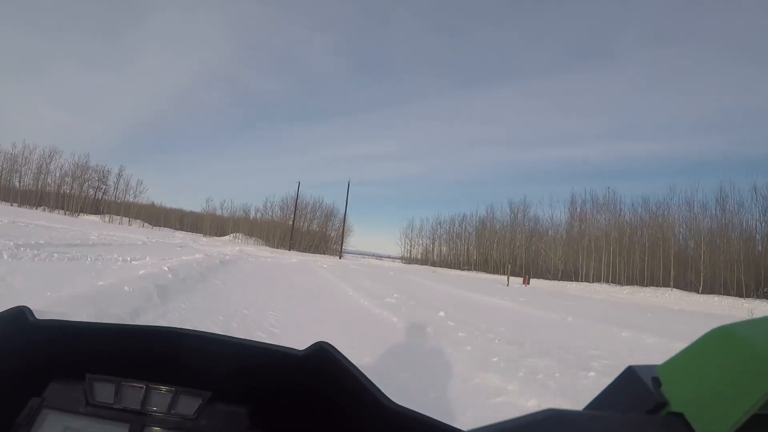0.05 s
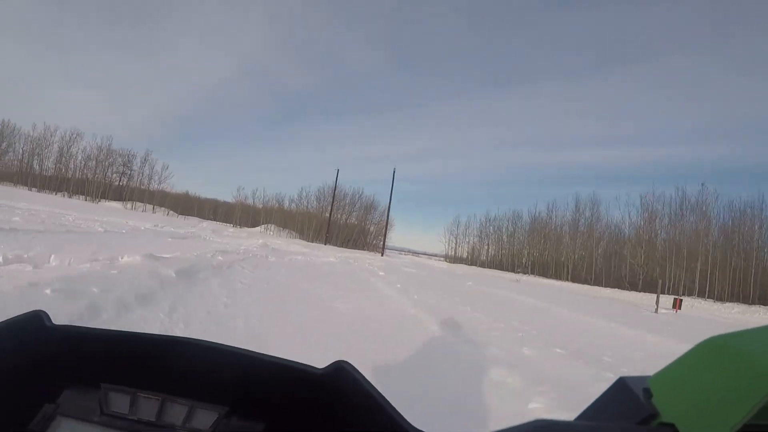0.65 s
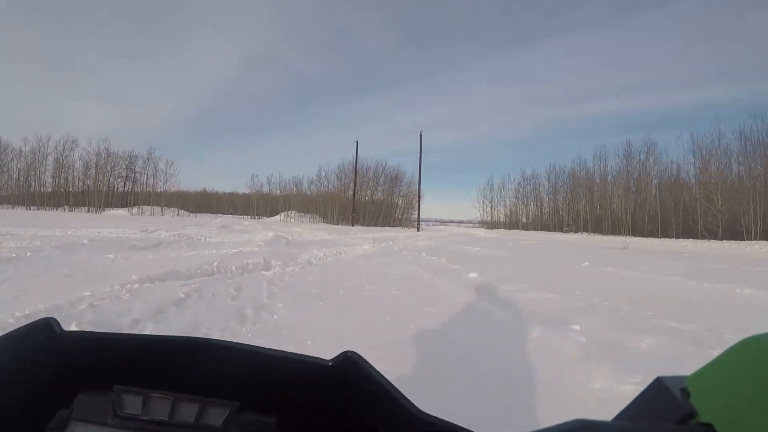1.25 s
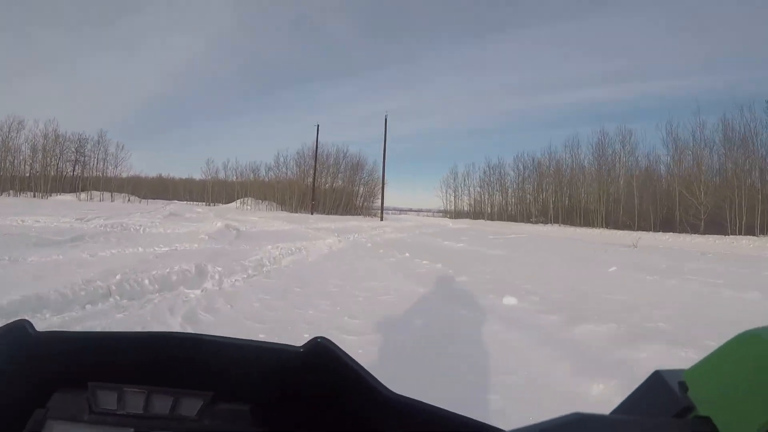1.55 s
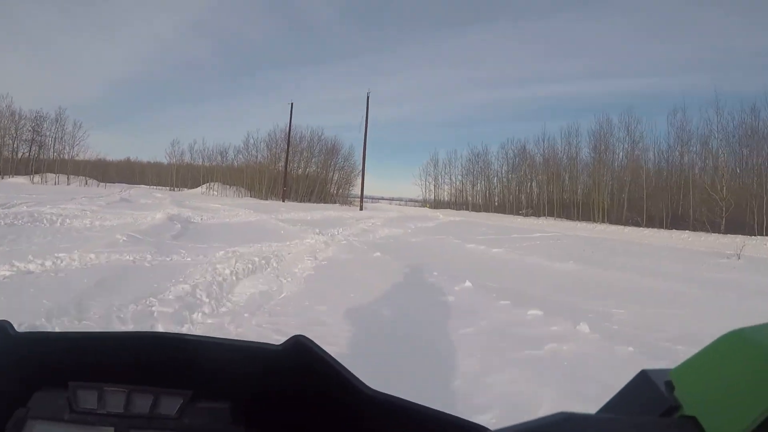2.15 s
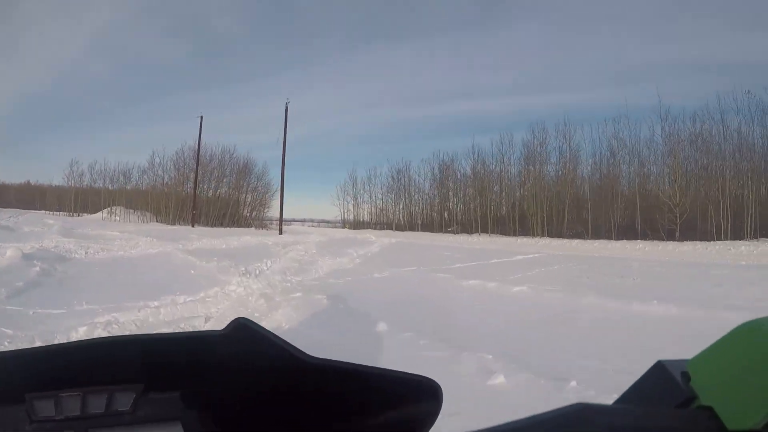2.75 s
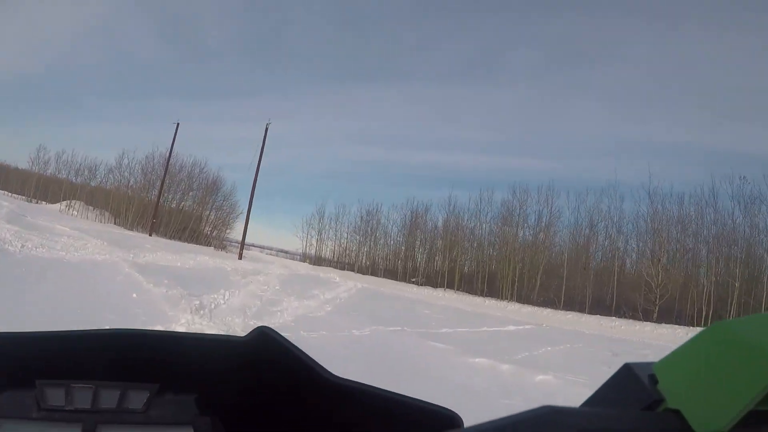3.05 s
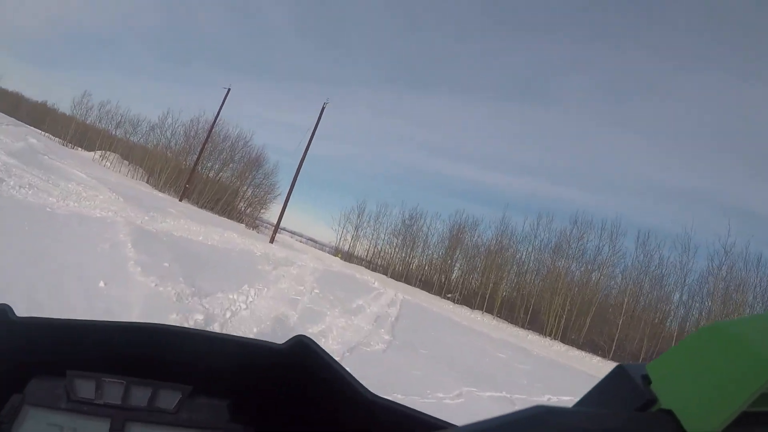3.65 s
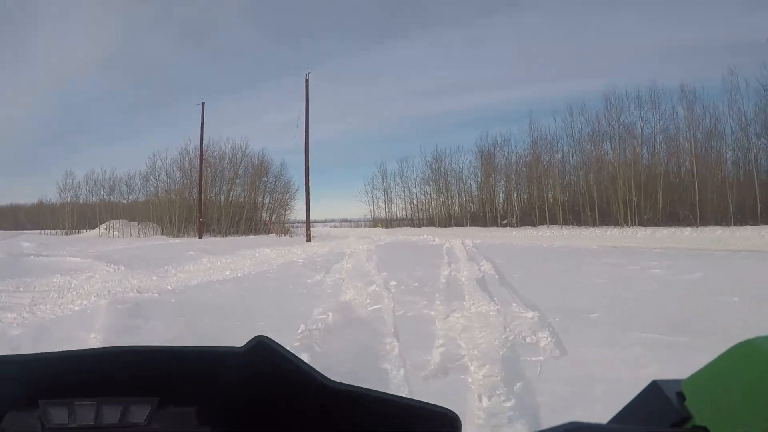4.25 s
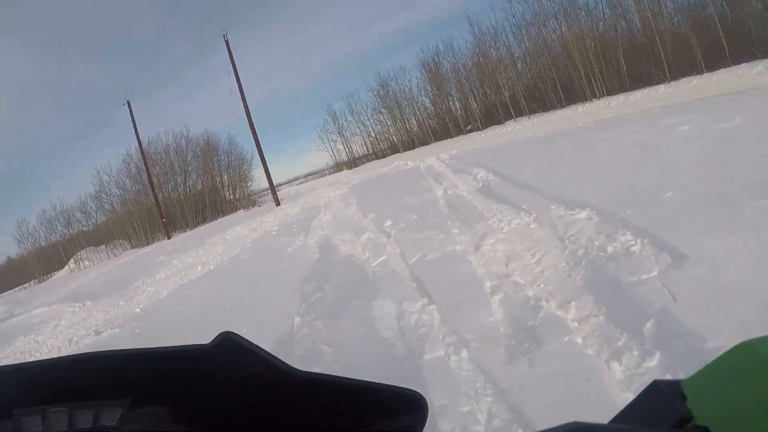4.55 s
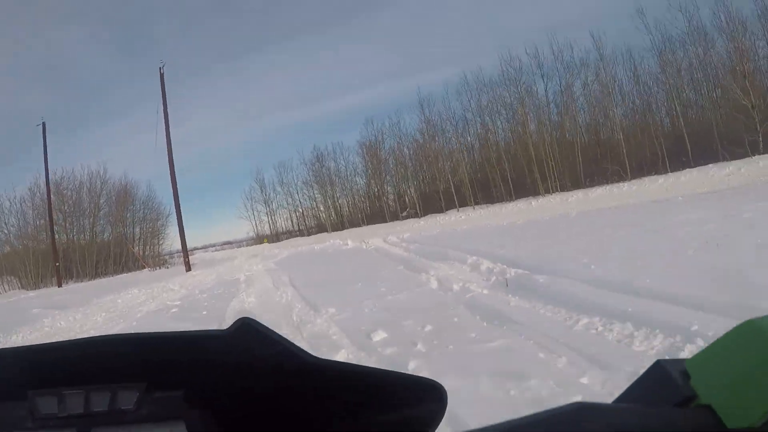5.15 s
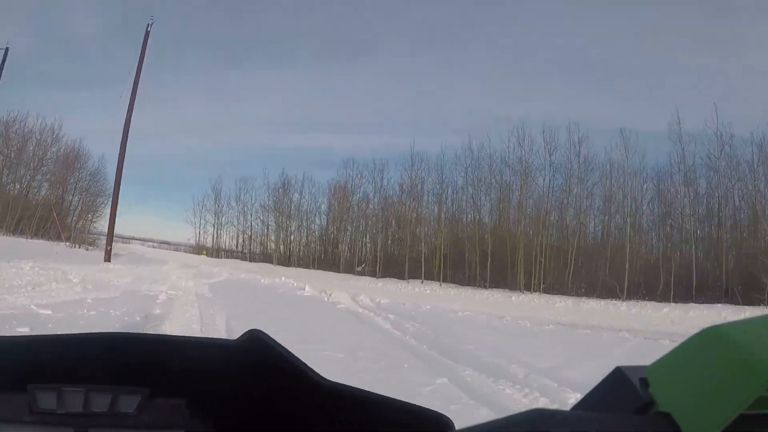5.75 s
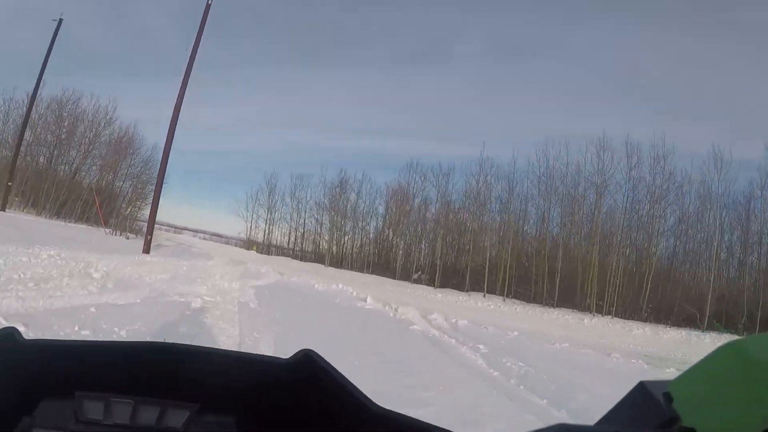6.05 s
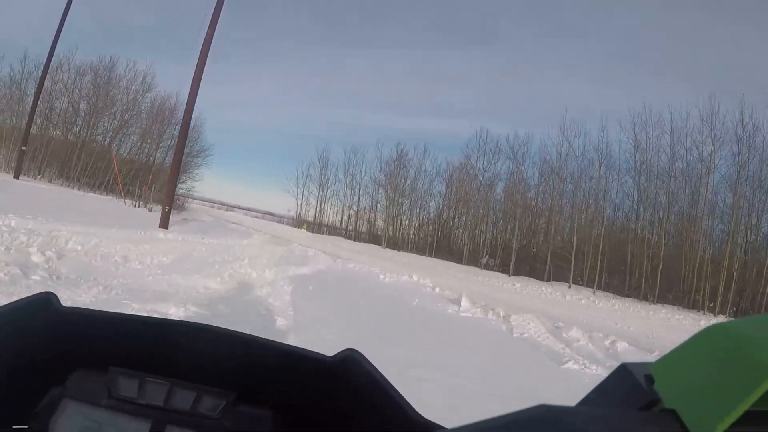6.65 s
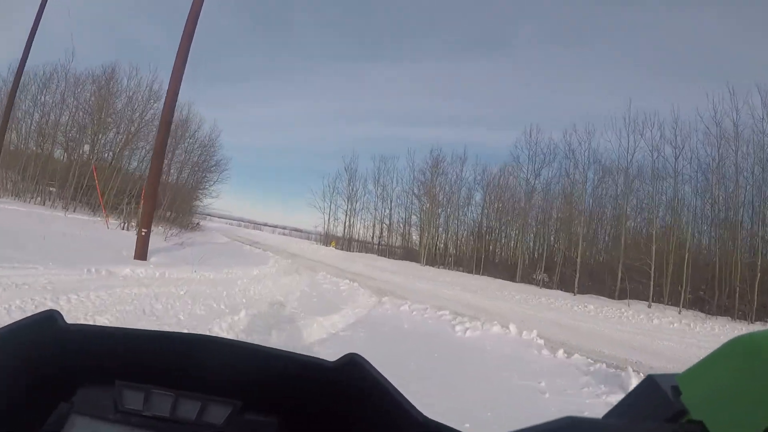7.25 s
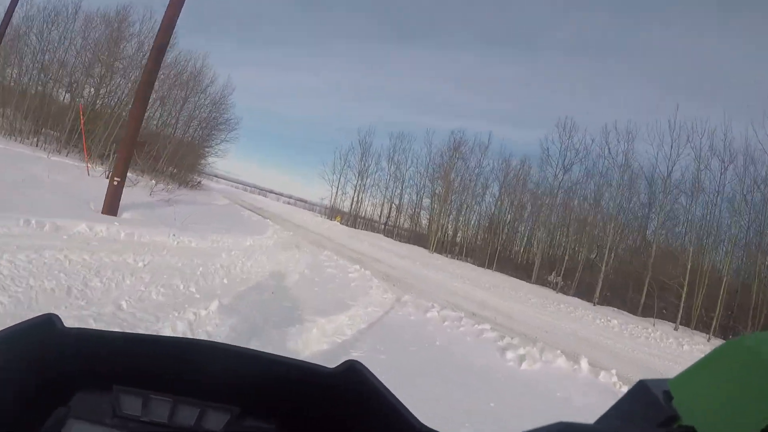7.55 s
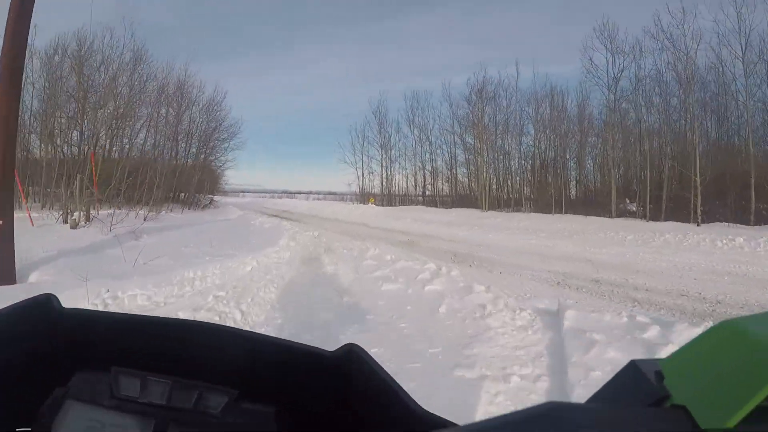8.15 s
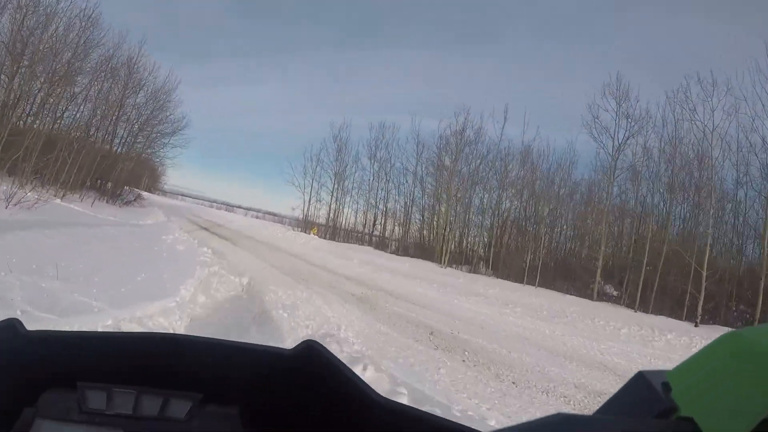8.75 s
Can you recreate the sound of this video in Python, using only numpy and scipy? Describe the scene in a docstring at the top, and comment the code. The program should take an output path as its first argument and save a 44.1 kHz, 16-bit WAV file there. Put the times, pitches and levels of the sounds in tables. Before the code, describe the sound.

A snowmobile's exhaust drones throughout, swelling and fading with the throttle as its pitch dips, briefly climbs past the middle and settles again. The track hums and rattles the panels over a low rumble and faint snow hiss. Bumps bring clusters of chassis knocks and sharp plastic clacks about a third of the way in and near the end. The microphone rides outdoors in a case on the rider.

```python
"""A snowmobile's twin-cylinder exhaust drones and fades with the throttle, heard from a camera in a
case on the rider. Track lugs hum and shake the chassis and panels; firings and slaps ring the case.
Bumps in the trail swell a rumble and jolt the chassis, packed snow hisses and ticks, and the loose
camera mount clacks and buzzes. Early on, a low hum sags in pitch."""
import sys
import numpy as np
from scipy import signal
from scipy.fft import rfft, irfft
from scipy.io import wavfile
from scipy.ndimage import uniform_filter1d, minimum_filter1d

SR = 44100
rng = np.random.default_rng(int(sys.argv[2]) if len(sys.argv) > 2 else 0)


def wrap_up_sound(samples):
    """Save the sound to the file named by the first command line argument, as 16-bit audio."""
    columns = np.atleast_2d(samples).T
    # keep every value between -1 and 1, then stretch to whole-number steps
    tamed = np.clip(columns, -1, 1)
    steps = np.round(tamed * 32767).astype(np.int16)
    wavfile.write(sys.argv[1], SR, steps)


N = 396900
T = np.arange(N) / SR
BOOM_DB = -19.5  # steady chassis boom under full power


def undb(db):
    """Decibels to gain."""
    return 10 ** (np.asarray(db) / 20)


def unit(x):
    """Scale to rms 1."""
    return x / np.sqrt(np.mean(x ** 2))


def even(x, seconds):
    """Hold the level steady over spans longer than this."""
    return x / np.sqrt(uniform_filter1d(x ** 2, int(seconds * SR)) + 1e-9)


def curves(table):
    """One automation curve for each value column of a timed table."""
    times, *columns = np.transpose(table)
    return [np.interp(T, times, column) for column in columns]


def gate(start, stop, attack_s, release_s):
    """1 from start to stop, with a ramp from 0 before and back to 0 after."""
    return np.clip(1 + np.minimum((T - start) / attack_s, (stop - T) / release_s), 0, 1)


def swells(rows, bed_db):
    """Level in dB of a bed plus a rounded swell for each row (middle/s, length/s, level/dB)."""
    power = sum((undb(db) * np.cos(np.pi * np.clip((T - middle) / length, -.5, .5))) ** 2
                for middle, length, db in rows)
    return 10 * np.log10(undb(bed_db) ** 2 + power)


def drift(rate_hz):
    """Smooth random modulation of rms 1, rolled off above this rate."""
    hz = np.arange(N // 2 + 1) * SR / N
    return unit(irfft(rfft(rng.standard_normal(N)) / (1 + (hz / rate_hz) ** 4), N))


def tone(turns, db, wobble_rad, flutter_db):
    """A sine around rms level db that wavers in phase and level."""
    gain = np.sqrt(2) * undb(db + flutter_db * drift(19))
    return gain * np.sin(2 * np.pi * turns + wobble_rad * drift(13))


def bursts(turns, decay_turns, scatter_db):
    """A puff of noise at the start of every cycle, each of its own strength."""
    noise = rng.standard_normal(N)
    strength = undb(scatter_db * rng.standard_normal(4096))
    return unit(noise * strength[turns.astype(int) % len(strength)] * np.exp(-(turns % 1) / decay_turns))


def knocks(turns, scatter_db):
    """One sharp push every cycle, each of its own strength."""
    return unit(np.diff(np.floor(turns), prepend=0) * undb(scatter_db * rng.standard_normal(N)))


def peaks(modes):
    """The spectrum (f/Hz, level/dB) of a set of resonances with steep skirts."""
    hz = np.geomspace(100, SR / 2, num=1500)
    power = sum(undb(db) ** 2 / (1 + ((hz - centre) / width) ** 2) ** 2 for centre, width, db in modes)
    return np.transpose([hz, 10 * np.log10(power)])


def response(spectrum, size=8192):
    """Minimum-phase impulse response of a spectrum (f/Hz, level/dB), falling away past its ends."""
    hz, db = np.transpose(spectrum)
    bins = np.maximum(np.arange(size // 2 + 1) * SR / size, 1)
    octaves_outside = np.abs(np.log2(bins / np.clip(bins, hz[0], hz[-1])))
    gain_db = np.interp(np.log(bins), np.log(hz), db) - 40 * np.minimum(octaves_outside, 2)
    cepstrum = irfft(np.log(undb(gain_db)))
    cepstrum[1:size // 2] *= 2
    cepstrum[size // 2 + 1:] = 0
    return irfft(np.exp(rfft(cepstrum)))


def ring(force, spectrum):
    """A body with this spectrum driven by a force; rms 1."""
    return unit(signal.fftconvolve(force, response(spectrum))[:N])


def contacts(rows, body, contact_s):
    """Each row (t/s, level/dB) is a brief rough contact that rings the body's impulse response."""
    out, t = np.zeros(N + 4096), T[:4096]
    for onset, db in rows:
        force = rng.standard_normal(len(t)) * np.exp(-(t / contact_s) ** 2)
        hit = signal.fftconvolve(force, body)[:len(t)]
        start = int(np.clip(onset * SR, 0, N - 1))
        out[start:start + len(t)] += undb(db) * hit / np.sqrt(np.sum(hit ** 2) / (contact_s * SR))
    return out[:N]


def trail_rumble():
    """A low bed of wind and ride rumble that swells on each bump."""
    # rumble spectrum: f/Hz, level/dB
    spectrum = [(8, -19.5), (18, -7.5), (27, -5.5), (33, 3.5), (44, -2.5), (56, -9.5), (66, -21.5),
                (90, -37), (130, -55.5)]
    # bumps in the trail: middle/s, length/s, level/dB
    bumps = [(.35, 0.67, -22), (1.55, 0.63, -16), (2.03, 0.7, -12.5), (2.68, 0.73, -16), (3.1, 0.4, -16.5),
             (3.36, .35, -12), (3.8, 0.64, -12.5), (4.26, 0.62, -12.5), (4.72, .4, -14),
             (5.42, 0.89, -14.5), (5.85, 0.46, -18), (6.42, 0.39, -17), (7.09, 0.2, -17), (7.64, 0.56, -16),
             (8.18, 0.45, -10.5), (8.76, 0.93, -12.5)]
    return even(ring(rng.standard_normal(N), spectrum), .2) * undb(swells(bumps, bed_db=-22.5))


def snow_hiss():
    """Skis hiss on packed snow, swelling as snow sprays up."""
    # hiss bands: f/Hz, width/Hz, level/dB
    bands = [(3246, 260, -1), (3783, 110, 2), (3964, 90, 1.5), (4230, 82, -2), (4355, 200, -4),
             (4670, 320, -4), (5220, 250, -6), (5730, 160, -1.5), (6030, 260, -6.5), (6560, 300, -10),
             (7500, 570, -16.5), (7950, 200, -17.5), (8450, 110, -10.5), (9000, 280, -20), (9800, 570, -28)]
    # sprays of snow: middle/s, length/s, level/dB
    sprays = [(.2, 1.1, -50.5), (2.3, 1.6, -53.5), (3.83, 0.4, -47.5), (5.58, 1.2, -48), (8.75, 0.86, -51)]
    return ring(rng.standard_normal(N), peaks(bands)) * undb(swells(sprays, bed_db=-53) + 1.7 * drift(19))


def snow_ticks(lug_hz):
    """Stray grains tick on the case; a fast track flings up a random shower of them."""
    # stray grains: t/s, level/dB
    grains = [(0.5538, -36.5), (0.8607, -36), (1.2066, -33), (1.2245, -35), (5.613, -35), (5.7157, -36),
              (5.9329, -32.5), (6.6497, -34.5), (6.7405, -33), (7.1028, -39), (7.1798, -33.5),
              (7.3456, -35)]
    # spectrum of a tick: f/Hz, level/dB
    tick = [(1200, -25.5), (2800, -15), (4100, 2), (5000, -3.5), (6000, -10), (7500, -9.5), (8500, -16.5),
            (10000, -37), (13000, -50.5)]
    fling_above_hz, flings_per_s, fling_db = 151, 55, -39
    times = T[(rng.random(N) < flings_per_s / SR) & (lug_hz > fling_above_hz)]
    flung = list(zip(times, fling_db + rng.standard_normal(len(times))))
    return contacts(list(grains) + flung, response(tick), contact_s=.0015)


def mount_clacks():
    """The loose mount clacks on bumps: a sharp crack and a short ring, softened by its plastic."""
    # modes of the mount: f/Hz, level/dB, t60/s
    modes = [(1320, 2.5, 0.005), (1770, 2, 0.02), (2230, -4.5, 0.0038), (2800, 8.5, 0.017),
             (3500, -12.5, 0.0017), (4310, 2, 0.014), (5150, 3, 0.0082), (6200, 1, 0.0078),
             (7380, -19, 0.0042), (8540, 1, 0.0045)]
    # softening by the plastic: f/Hz, gain/dB
    plastic = [(500, -0.5), (4000, -6), (7000, -1), (8500, -1.5), (9500, -9.5), (11000, -21),
               (14000, -12.5)]
    # clacks: t/s, level/dB
    clacks = [(2.5839, -33), (2.965, -18), (3.1157, -27), (3.2827, -30), (3.383, -33.5), (3.6955, -32),
              (3.8238, -31), (3.8457, -31), (4.094, -36), (4.7619, -31.5), (7.594, -35.5), (7.7438, -19.5),
              (7.823, -31.5), (7.9119, -22.5), (8.0348, -33.5), (8.0616, -27), (8.1372, -29.5),
              (8.8661, -17)]
    t = T[:4096]
    ringing = sum(undb(db) * np.sin(2 * np.pi * hz * t) * np.exp(-np.log(1000) * t / t60)
                  for hz, db, t60 in modes)
    crack = undb(22) * (t == 0)
    return contacts(clacks, signal.fftconvolve(ringing + crack, response(plastic)), contact_s=.0038)


def mount_buzz(crank):
    """The mount chatters once a crankshaft turn, in fitful spells with a faint tremble between."""
    # chatter resonances: f/Hz, width/Hz, level/dB
    modes = [(4230, 540, -15), (6100, 370, -20.5), (8490, 71, -2)]
    # spells of buzzing: from/s, to/s, level/dB
    buzzes = [(2.88, 2.908, -54), (3.07, 3.1, -52), (3.28, 3.33, -58), (3.82, 3.927, -51.5),
              (3.98, 4.135, -52.5), (4.251, 4.468, -59), (6.8, 7.079, -62), (8.92, 8.974, -52)]
    chatter = ring(bursts(crank, .36, 3.8), peaks(modes))
    spells = sum(undb(db) * ((T > start) & (T < stop)) for start, stop, db in buzzes)
    fits = undb(4.5 * drift(35))
    tremble = undb(-78 + 6 * drift(8))
    return chatter * uniform_filter1d(spells * fits + tremble, size=400)


def chassis_jolts():
    """Bumps land as rough knocks on the chassis."""
    # jolts: t/s, level/dB
    jolts = [(1.097, -23.5), (1.886, -34), (3.283, -23), (3.305, -18), (3.775, -22), (7.567, -22),
             (8.095, -21.5), (8.148, -18), (8.834, -27), (8.914, -22), (8.973, -20.5)]
    # spectrum of a jolt: f/Hz, level/dB
    spectrum = [(300, 0.5), (700, -2), (1230, 8), (1450, -6.5), (1650, 0), (2100, -28.5), (2700, -12.5),
                (4000, -36), (7000, -48)]
    return contacts(jolts, response(spectrum), contact_s=.013)


def sagging_hum():
    """A low hum fades in, sinks towards a lower pitch and fades out."""
    from_s, to_s, fade_s = 1.1, 2.5, .27
    start_hz, floor_hz, settle_s = 122, 85.4, .69
    hz = floor_hz + (start_hz - floor_hz) * np.exp(-np.maximum(T - from_s, 0) / settle_s)
    fade = gate(from_s + fade_s, to_s - fade_s, fade_s, fade_s)
    return fade * tone(np.cumsum(hz) / SR, db=-28.5, wobble_rad=.17, flutter_db=4.7)


def clatter(crank, lugs):
    """Firings and track slaps ring the camera case, and the lugs add a higher whirr."""
    # load on the running gear: t/s, clatter/dB, whirr/dB
    load = [(0, -25.5, -47), (1.05, -25.5, -45.5), (1.35, -26, -48), (1.63, -24, -40), (1.95, -24, -41.5),
            (2.83, -26.5, -49), (2.97, -24, -46.5), (3.3, -26.5, -46), (3.46, -27, -47.5),
            (3.7, -21.5, -39.5), (3.95, -27.5, -45.5), (5, -27, -49.5), (5.28, -26.5, -44.5),
            (5.57, -20.5, -42.5), (6.07, -28, -51), (6.54, -27, -46), (7.05, -29.5, -53), (7.45, -31, -52),
            (7.62, -27, -51), (7.95, -28, -46.5), (8.13, -24.5, -43.5), (8.32, -29, -50.5),
            (8.58, -24, -44.5), (9, -27, -47.5)]
    # resonances of the case: f/Hz, width/Hz, level/dB
    case_modes = [(601.4, 58, -7.5), (707, 63, -10.5), (774, 22, -12), (822, 47, -13.5), (931, 54, -9),
                  (1040, 29, -4.5), (1129, 32, -1.5), (1228.6, 56.6, 0), (1315, 40, -5.5), (1410, 74, -18),
                  (1563, 30, -10.5), (1642, 15, -11), (1692, 60, -14), (1770, 190, -26)]
    # resonances of the track's whirr: f/Hz, width/Hz, level/dB
    whirr_modes = [(2050, 510, -19.5), (2530, 320, -9), (2592, 180, 0), (2756, 55, 3.5), (3020, 310, -20.5)]
    clatter_db, whirr_db = curves(load)
    case_force = bursts(2 * crank, 1.1, 1) + .5 * bursts(crank, .86, .93)
    case_force += .33 * knocks(crank, .83) + .24 * knocks(lugs, 1)
    case = even(ring(case_force, peaks(case_modes)), .056) * undb(clatter_db)
    lug_force = bursts(lugs, 1.8, .95) + .29 * knocks(lugs, .83)
    whirr = even(ring(lug_force, peaks(whirr_modes)), .13) * undb(whirr_db)
    return case + whirr


def suspension(slack):
    """Level in dB of the chassis boom: it swells as the suspension works and lifts off the throttle."""
    # booms: middle/s, level/dB
    booms = [(.03, -12.5), (1.7, -13), (2.05, -19.5), (2.5, -20), (2.85, -12), (3.22, -17), (3.62, -18),
             (4.38, -14.5), (4.6, -20.5), (5.32, -17.5), (6.64, -15), (6.88, -22), (7.46, -20), (8.36, -13),
             (8.72, -18)]
    return swells([(middle, .15, db) for middle, db in booms], bed_db=BOOM_DB + 2 * slack)


def track(lugs, hum_db, whine_db, boom_db):
    """Lugs pass the drive wheels with a hum and slap unevenly, shaking chassis and panels."""
    # chassis spectrum: f/Hz, level/dB
    chassis_body = [(50, -26.5), (72, -14.5), (95, -5.5), (115, -15), (135, -10.5), (165, 3), (195, -6),
                    (215, 2), (238, 1), (255, -20), (290, -15), (330, -34.5)]
    # panel spectrum: f/Hz, level/dB
    panel_body = [(270, -31.5), (300, -28.5), (325, 4), (352, 9), (385, -0.5), (430, -4.5), (495, -7),
                  (530, -25), (640, -20.5), (760, -24.5), (1000, -45.5)]
    # how hard the track slaps the panels: t/s, level/dB
    slap = [(0, -19.5), (.5, -17.5), (.7, -20.5), (1.08, -23.5), (1.17, -16.5), (2.1, -18), (2.5, -18.5),
            (2.98, -23.5), (3.15, -16), (3.48, -22.5), (3.6, -16), (3.95, -20), (4.6, -19), (5.12, -27),
            (5.4, -16.5), (6.15, -26.5), (7.7, -27.5), (8.12, -21), (8.3, -24.5), (8.43, -20), (9, -28)]
    slap_db, = curves(slap)
    hum = tone(lugs, hum_db, .077, 1.8)
    whine = tone(3 * lugs, whine_db - .3, .07, 3) + tone(5 * lugs, hum_db - 22.5, .097, 1.9)
    chassis = even(ring(bursts(lugs, .79, 3.6), chassis_body), .17) * undb(boom_db)
    panels = even(ring(bursts(lugs, .4, .84), panel_body), .12) * undb(slap_db)
    return hum + whine + chassis + panels


def throttle():
    """Base levels in dB of the firing tone and overtones: each squeeze opens, holds and falls back."""
    # squeezes of the throttle: held from/s, to/s, firing tone/dB, overtones/dB
    squeezes = [(0, 0.017, -11.5, -37), (.3, .6, -15, -33), (.69, 1.033, -7, -29.5),
                (1.68, 1.916, -13.5, -32.5), (2.265, 2.735, -11.5, -32), (3.2, 3.3, -17.5, -34),
                (3.517, 3.553, -11, -32.5), (3.727, 4.598, -11.5, -36.5), (4.75, 5.116, -9, -28),
                (5.6, 5.9, -9.5, -37), (5.98, 6.06, -6.5, -48), (6.15, 6.46, -10.5, -32),
                (6.55, 7.426, -8.3, -31), (7.68, 7.707, -11.5, -37.5), (8.15, 8.384, -18.5, -33.5),
                (8.96, 9, -11, -33)]
    coast_firing_db, coast_overtone_db = -23.5, -31.5
    starts, stops, firing_db, overtone_db = np.transpose(squeezes)
    opening = np.array([gate(a, b, attack_s=.25, release_s=.26) for a, b in zip(starts, stops)])
    firing_lift = np.max((firing_db - coast_firing_db)[:, None] * opening, axis=0)
    overtone_lift = (overtone_db - coast_overtone_db) @ opening / np.maximum(opening.sum(axis=0), 1)
    return coast_firing_db + firing_lift, coast_overtone_db + overtone_lift


def exhaust(crank, crank_hz, firing_db, overtone_db, slack, boom_db):
    """Two firings a turn give the drone, ragged when slack; unequal cylinders add the odd orders."""
    # upper exhaust orders: multiple of the crankshaft rate, level/dB relative to the sixth
    overtones = [(4, -1.5), (5, -10.5), (6, 0), (7, -3), (8, -2.5), (9, -2), (10, -10.5), (12, -5.5)]
    # pipe response that they sweep through: f/Hz, gain/dB
    pipe = [(280, -4.5), (350, 3.5), (400, -5.5), (450, -1.5), (510, -0.5), (550, -16), (600, -12.5),
            (720, -12), (800, -10.5), (900, -10.5), (1100, -4.5)]
    overrun_hz, overrun_span_hz = 81.8, 5.4
    chassis_hz, chassis_width_hz = 218, 15
    drone = tone(2 * crank, firing_db - 2.3 * slack, .05 + .29 * slack, .35 + 1.6 * slack)
    # on the overrun a fast, slack engine thumps once a turn and its overtones duck
    overrun = slack * np.clip((crank_hz - overrun_hz) / overrun_span_hz, 0, 1)
    thump = tone(crank, -34 + 8 * slack + 7 * overrun, .83, 1)
    # the booming chassis lifts the third order near its resonance
    detuning_db = 10 * np.log10(1 + ((3 * crank_hz - chassis_hz) / chassis_width_hz) ** 2)
    third = tone(3 * crank, -25.5 + 1.6 * (boom_db - BOOM_DB) - detuning_db, .39, 3.3)
    out = drone + thump + third
    for order, db in overtones:
        pipe_db = np.interp(order * crank_hz, *np.transpose(pipe))
        wobble_rad = np.clip(.09 * order - .25, .2, 1)  # higher orders smear more
        out += tone(order * crank, overtone_db - 13 * overrun + db + pipe_db, wobble_rad, 2.7)
    return out


def scene():
    """Crankshaft and track set the machine's pitches; throttle, load and trail ride the levels."""
    # crankshaft speed: t/s, f/Hz
    engine_run = [(0, 101.1), (.45, 89.8), (.82, 84.5), (1.15, 72.8), (1.42, 67.8), (2, 72.2), (2.65, 73.6),
                  (3.28, 67), (3.78, 72.2), (4.5, 72.3), (5, 76.3), (5.2, 83.5), (5.63, 93.3), (5.89, 83.7),
                  (6.24, 73.8), (6.59, 77.1), (6.89, 76.1), (7.28, 78.7), (7.65, 71), (9, 68.8)]
    # running track: t/s, lug rate/Hz, hum/dB, whine/dB
    track_run = [(0, 171, -15, -27), (.3, 154, -16, -26), (.55, 146, -16, -25), (.75, 143, -30, -33),
                 (1.4, 138, -27, -28), (2.25, 145, -28, -26), (2.7, 147, -28, -28), (3.1, 139, -30, -36),
                 (5.2, 145, -30, -38), (5.33, 148, -26, -26), (5.66, 154, -26, -25), (5.85, 151, -30, -39),
                 (7.4, 146, -34, -42), (8, 140, -34, -35), (9, 138, -34, -34)]
    crank_hz, = curves(engine_run)
    lug_hz, hum_db, whine_db = curves(track_run)
    crank, lugs = np.cumsum(crank_hz) / SR, np.cumsum(lug_hz) / SR  # turns made, lugs passed
    firing_db, overtone_db = throttle()
    slack = np.clip((-5.5 - firing_db) / 10, 0, 1)  # 0 at full power, 1 off the throttle
    boom_db = suspension(slack)
    mix = exhaust(crank, crank_hz, firing_db, overtone_db, slack, boom_db)
    mix += track(lugs, hum_db, whine_db, boom_db) + clatter(crank, lugs)
    mix += trail_rumble() + snow_hiss() + chassis_jolts() + sagging_hum()
    mix += mount_buzz(crank) + mount_clacks() + snow_ticks(lug_hz)
    return mix[None]


def record(dry):
    """The camera's limiter holds the peaks down, and a steep low-pass cuts the top."""
    ceiling, top_hz = .92, 12000
    gain = np.minimum(1, ceiling / (np.abs(dry) + 1e-9))
    gain = uniform_filter1d(minimum_filter1d(gain, size=500), size=500)
    gain = uniform_filter1d(gain, size=200)
    return signal.sosfilt(signal.ellip(8, .2, 70, top_hz, fs=SR, output="sos"), dry * gain)


dry = scene()
out = record(dry)
wrap_up_sound(out)
```